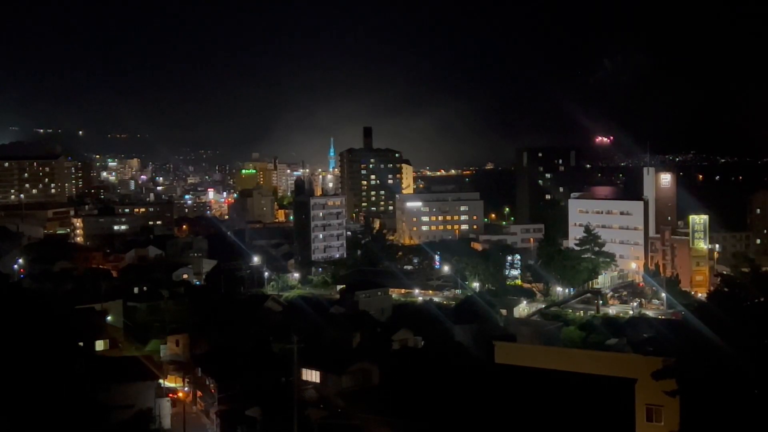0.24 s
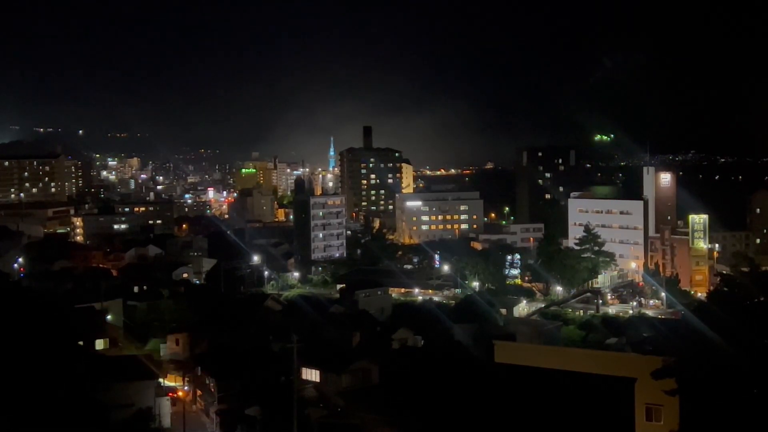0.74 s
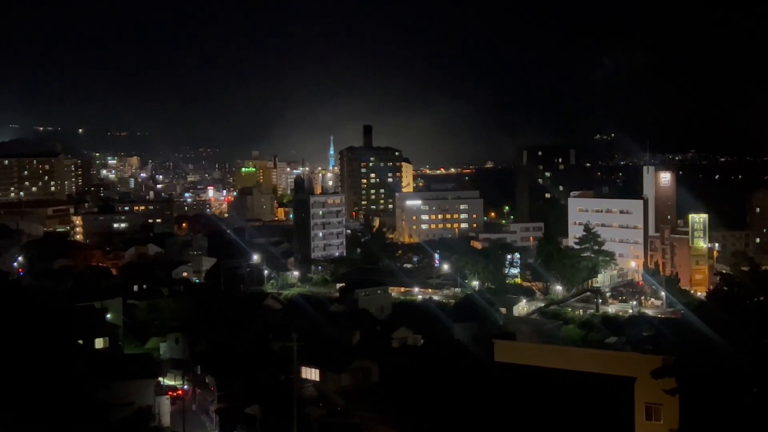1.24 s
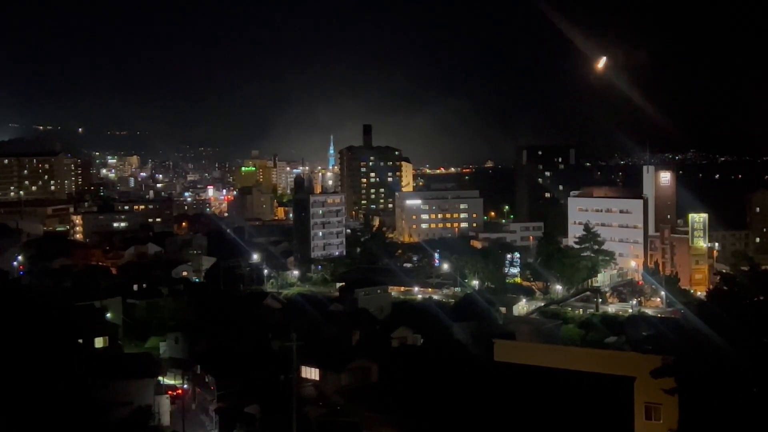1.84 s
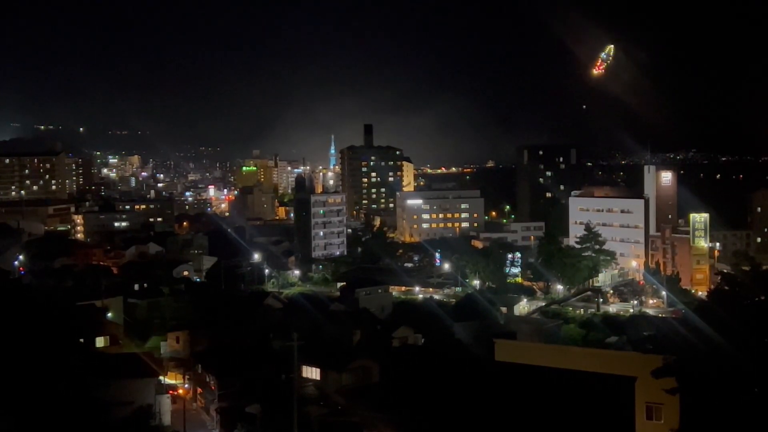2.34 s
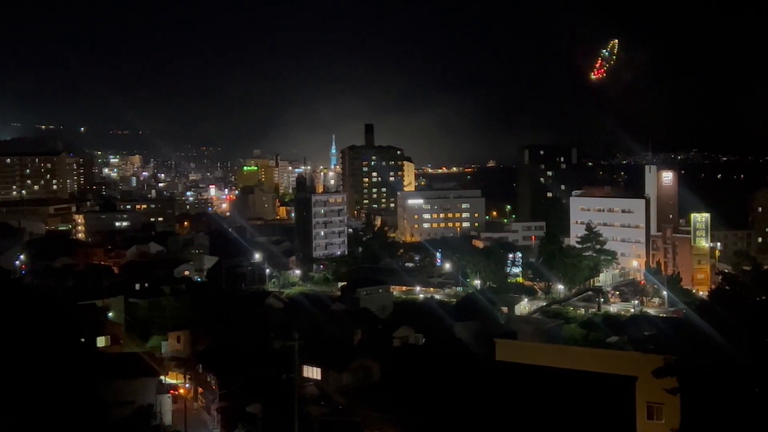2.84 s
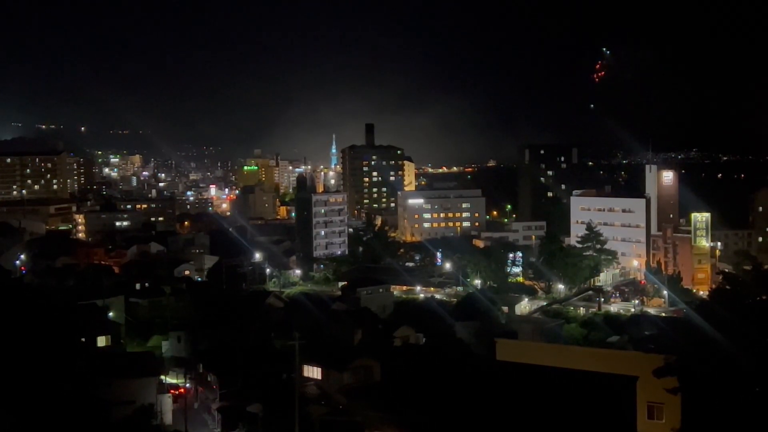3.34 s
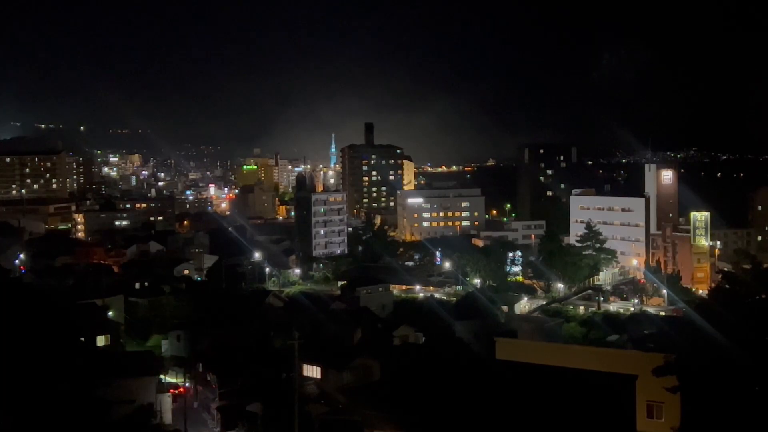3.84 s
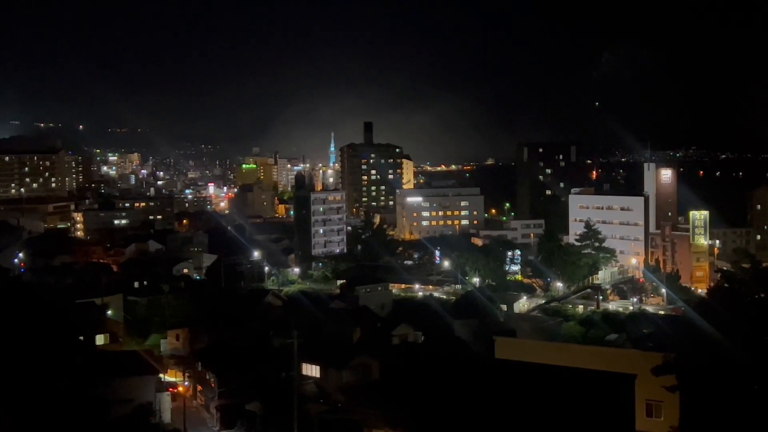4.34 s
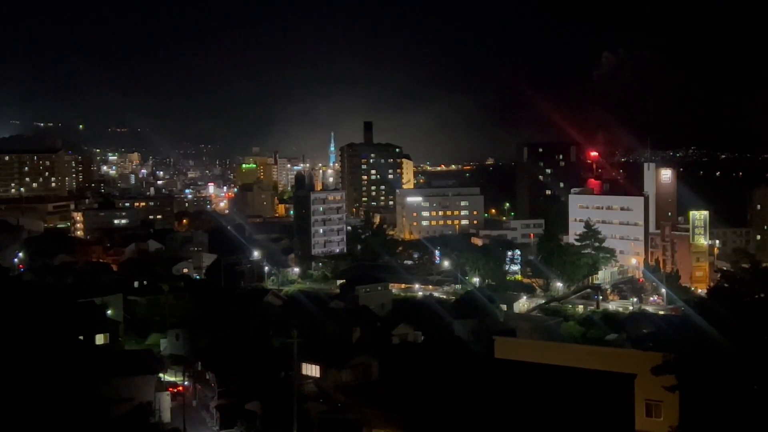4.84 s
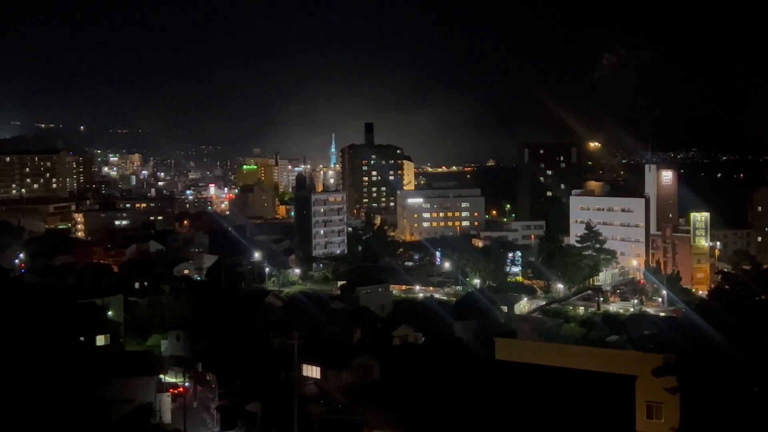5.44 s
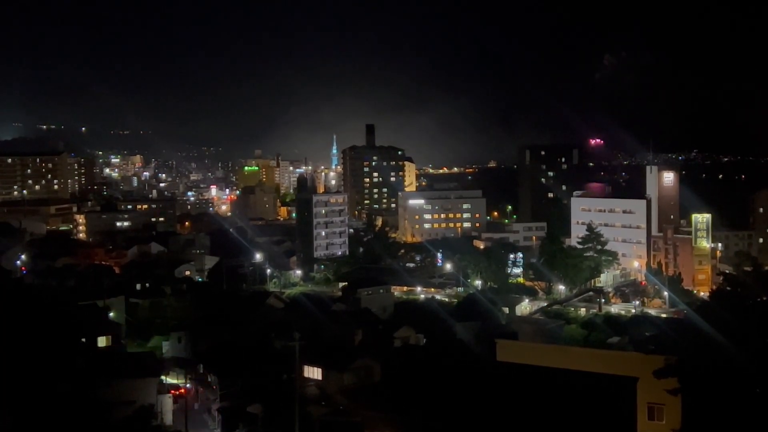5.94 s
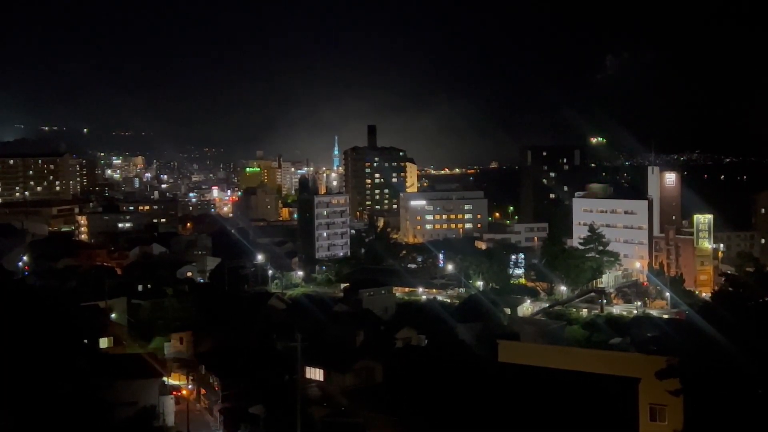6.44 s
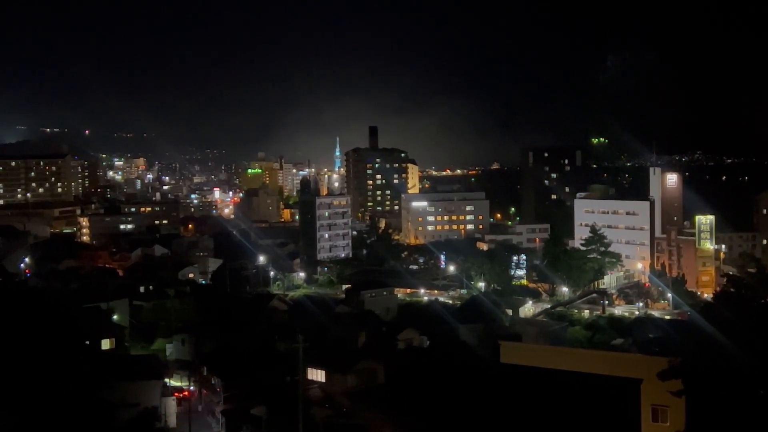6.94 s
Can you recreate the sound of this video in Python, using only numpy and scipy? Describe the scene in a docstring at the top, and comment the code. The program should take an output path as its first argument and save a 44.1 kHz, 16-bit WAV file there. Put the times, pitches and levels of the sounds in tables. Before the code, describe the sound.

Two distant firework booms echo over a city at night, while a bush cricket buzzes faintly over a low engine drone.

```python
"""Fireworks over a city at night

Two far firework shells boom, with a much fainter one between them. Buildings throw each boom back
and the streets roll on with it. Close by, a bush cricket buzzes without pause by scraping its wings;
other insects join in thinly. A distant engine drones under the wash of traffic, with a few dull thuds."""
import sys
import numpy as np
from scipy import signal
from scipy.fft import rfft, irfft, next_fast_len
from scipy.io import wavfile
from scipy.ndimage import map_coordinates

SR = 44100
rng = np.random.default_rng(int(sys.argv[2]) if len(sys.argv) > 2 else 0)


def store_pcm(level_fs):
    """Save levels as 16-bit WAV."""
    pcm = np.round(np.clip(level_fs, -1, 1) * 32767).astype(np.int16)
    wavfile.write(sys.argv[1], SR, np.atleast_2d(pcm).T)


N = 317079
TIME = np.arange(N) / SR

# Shell bursts. Treble fades above an "edge"; a "t60" is the time to fade by 60 dB.
# (time [s], relative level [dB], edge [Hz], scatter [dB], change per bounce [dB], bounce edge [Hz],
#  roll level [dB], roll edge [Hz], roll t60 [s])
SHELLS = [(1.4333, -14, 1900, 3, 8, 134, -33, 2400, 0.5), (3.038, -27.5, 250, 4, -3, 400, -50.5, 400, 1.2),
          (6.4882, 1, 1710, -2, -11, 1410, -36, 4500, 2)]


def blasts(level_db=-6, scatter_t60=0.075, scatter_rise_s=0.0028, scatter_hz=900):
    """Each boom is one pulse of air pressure, trailed by its scatter off nearby walls."""
    # a bang's tone after its long way through the air: (frequency [Hz], relative level [dB])
    bang_spectrum = [(25, -32), (45, -15), (62, -10), (85, -11), (125, -.5), (175, 2), (215, -1.5),
                     (270, -4), (360, -11.5), (560, -12), (1000, -22), (2300, -29.5), (4200, -42),
                     (6500, -59), (9000, -90)]
    out, bang = np.zeros(N), colour(bang_spectrum)
    gain = amp(level_db) / np.abs(pulse(bang)).max()
    for start_s, db, edge_hz, scatter_db in arrivals():
        wave = pulse(lambda hz: bang(hz) * air(hz, edge_hz))
        t = np.arange(len(wave)) / SR
        paths = rng.standard_normal(len(t)) * amp(-60 * t / scatter_t60) * fade_in(t, scatter_rise_s)
        paths *= amp(scatter_db) / np.linalg.norm(paths)
        # ledges and railings scatter short waves; the bass passes them by
        paths = signal.lfilter(*signal.butter(1, scatter_hz, "high", fs=SR), paths)
        paths[0] += 1  # the unscattered pulse
        add(out, start_s, -gain * amp(db) * signal.fftconvolve(wave, paths))
    return out


def arrivals(bounces=2, round_trip_s=0.0075, echo_scatter_db=3):
    """A boom arrives directly, then off the nearest walls, duller each bounce, then off far buildings."""
    # echoes off single buildings: (time [s], relative level [dB], treble edge [Hz])
    echoes = [(1.566, -14, 130), (1.668, -18.5, 450), (1.696, -23.5, 900), (1.876, -28.5, 2400),
              (2.099, -27.5, 2600), (6.546, -21, 350), (6.769, -22.5, 1600), (7.157, -23, 800)]
    near = []
    for start_s, db, edge_hz, scatter_db, step_db, bounce_hz, *_ in SHELLS:
        for k in range(bounces + 1):
            dulled_hz = 1 / (1 / edge_hz + k / bounce_hz)
            near.append((start_s + k * round_trip_s, db + k * step_db, dulled_hz, scatter_db))
    return near + [(*echo, echo_scatter_db) for echo in echoes]


def rolls(lumpy_db=0.8, lag_s=0.012, rise_s=0.0054):
    """Countless house fronts return the boom in clumps: the next block at once and loud, the farthest faint and
    long."""
    # tone of the rolling echo: (frequency [Hz], relative level [dB])
    roll_spectrum = [(25, -27), (80, -5), (150, 2), (230, -5.5), (330, -12), (600, -18.5), (1100, -22),
                     (2200, -33), (4000, -45), (7000, -61)]
    # (relative level [dB], treble edge [Hz], t60 [s])
    next_block, far_blocks = (9, 700, 0.1), (-14, 900, 9.7)
    out, tone = np.zeros(N), colour(roll_spectrum)
    for start_s, *_, db, edge_hz, t60 in SHELLS:
        start = round((start_s + lag_s) * SR)
        t = TIME[:N - start]
        roll = np.zeros(len(t))
        for zone_db, zone_hz, zone_t60 in (next_block, (0, edge_hz, t60), far_blocks):
            echoes = filtered(rng.standard_normal(N)[start:], lambda hz: tone(hz) * air(hz, zone_hz))
            roll += unit(echoes) * amp(zone_db - 60 * t / zone_t60)
        out[start:] += roll * amp(db + lumpy_db * wobble(60)[start:]) * fade_in(t, rise_s)
    return out


def bush_cricket(tooth_hz=565, slip=.06, mid_stroke_s=0.0137, level_db=-58.0,
                 leaves_db=-3, leaves_t60=0.04, uneven_teeth_db=0.84, effort_db=0.64):
    """Each wing stroke drags a scraper over teeth; each tooth rings the wing. Leaves scatter the clicks."""
    # speed of the wings: (time [s], stroke rate [Hz])
    stroke_rates = [(0, 26.12), (7.19, 25.94)]
    # the scraper's push through one stroke: (position [0 to 1], relative force [dB])
    stroke_force = [(0, -36), (.14, -9.5), (.3, -6.5), (.44, 3.5), (.5, -1), (.64, 0.5), (.69, -25),
                    (.85, -17), (1, -16.5)]
    # how the wing rings: (frequency [Hz], relative level [dB])
    wing_spectrum = [(6000, -34), (7700, -16.5), (8300, -7), (8650, 1.5), (9200, -1), (9550, -4),
                     (9950, -1.5), (10600, -7), (11300, -11.5), (12100, -22), (13000, -16), (13550, -17),
                     (14200, -21), (15600, -22.5)]
    # slow changes in the song's strength: (time [s], level change [dB])
    vigour = [(0, 0.5), (.7, 1.3), (2, -0.1), (3.2, 0), (4.3, -0.9), (5.7, -0.5), (6.5, 0.5), (7.19, 0)]
    strokes = np.cumsum(curve(stroke_rates)) / SR - mid_stroke_s * stroke_rates[0][1] + .5
    force_db = np.interp(strokes % 1, *np.transpose(stroke_force)) + effort_db * wobble(26)
    teeth_passed = np.cumsum(tooth_hz * (1 + slip * wobble(110))) / SR
    tooth_hits = np.diff(np.floor(teeth_passed), prepend=0)
    clicks = tooth_hits * amp(force_db + uneven_teeth_db * rng.standard_normal(N))
    # each click's energy dies away quickly among the leaves
    decay = amp(-60 * np.arange(SR // 20) / SR / leaves_t60) ** 2
    energy = np.abs(signal.fftconvolve(clicks ** 2, decay / decay.sum())[:N])
    leaves = np.sqrt(energy) * rng.standard_normal(N)
    song = signal.fftconvolve(clicks + amp(leaves_db) * leaves, pulse(colour(wing_spectrum)))[:N]
    return unit(song) * amp(level_db + curve(vigour))


def far_insects(chorus_db=-69):
    """Farther insects make a blurred chorus, one swelling rasp and a few thin, fading tones."""
    # one insect's rasp swells and fades: (time [s], level [dB])
    rasp_levels = [(0, -87), (3.1, -93), (3.6, -68.5), (4.0, -64.5), (4.5, -67.5), (5.1, -73), (5.8, -90),
                   (7.19, -92)]
    # cricket tones: (pitch [Hz], pitch wobble [Hz], level [dB], fade start [s], fade [dB/s])
    tones = [(7469, 6, -63, .1, 39), (5278, 10, -75.5, .1, 26), (5430, 45, -82, .22, 24)]
    out = amp(chorus_db) * band(centre_hz=8900, width_hz=1300)
    out += amp(curve(rasp_levels)) * band(centre_hz=8300, width_hz=1400)
    for hz, wobble_hz, db, start_s, fade in tones:
        phase = 2 * np.pi * np.cumsum(hz + wobble_hz * wobble(60)) / SR
        level_db = db - fade * np.maximum(TIME - start_s, 0) + 1.3 * wobble(60)
        out += np.sqrt(2) * np.sin(phase) * amp(level_db)
    return out


def engine(flutter_db=1.43, jitter_cycles=0.005):
    """Distance rounds exhaust pulses to a few low tones; the higher ones fade as the engine draws away."""
    # the engine slowly loses speed: (time [s], firing rate [Hz])
    firing_rates = [(0, 68.5), (.5, 69.4), (1.15, 68.37), (5.4, 66.17), (7.19, 66.2)]
    # its drone swells and sinks: (time [s], level change [dB])
    swell = [(0, -4), (.65, 4), (1.2, -3.5), (1.9, 1), (2.4, -3.5), (4.35, 2.5), (5.7, -5), (6.35, -1.5),
             (7.19, -4)]
    # exhaust tones at 1 to 4 times the firing rate: (level [dB], share of swell [0 to 1], fade [dB/s])
    harmonics = [(-47.5, 1, 0), (-50, .35, 0.8), (-54.5, 0.092, 2), (-68.5, .1, 2.5)]
    firings = np.cumsum(curve(firing_rates)) / SR + jitter_cycles * wobble(12)
    out, swell_db = np.zeros(N), curve(swell)
    for k, (db, share, fade) in enumerate(harmonics, 1):
        level_db = db + share * swell_db - fade * TIME + flutter_db * wobble(7.1)
        out += amp(level_db) * np.cos(2 * np.pi * k * firings)
    return out


def thuds(t60=0.13, rise_s=0.0061):
    """Only the lowest tone of a far thud arrives."""
    # deep thuds: (time [s], level before fading [dB], pitch [Hz])
    hits = [(2.12, -36, 38), (3.05, -47, 40), (4.004, -35, 40)]
    out, t = np.zeros(N), np.arange(SR // 2) / SR
    for start_s, db, pitch_hz in hits:
        loudness = amp(db - 60 * t / t60) * fade_in(t, rise_s)
        add(out, start_s, loudness * np.sin(2 * np.pi * pitch_hz * t))
    return out


def city(traffic_db=-61, rise_db_per_s=0.4129, waver_db=0.15, rumble_db=-56, hiss_db=-73):
    """Traffic blends into a slowly growing wash, over a low rumble and a faint, even hiss."""
    # tone of the traffic: (frequency [Hz], relative level [dB])
    traffic_spectrum = [(160, -12), (280, -3.5), (380, -5.5), (550, -4.5), (750, -4.5), (1000, -6.5),
                        (1400, -11), (1900, -17.5), (3000, -23.5), (6000, -39), (8000, -70)]
    # tone of the rumble: (frequency [Hz], relative level [dB])
    rumble_spectrum = [(15, 8), (30, -6.5), (50, -2), (80, 4.5), (110, -4.5), (190, -1), (280, -3.5),
                       (400, -21), (800, -69)]
    wash = noise(colour(traffic_spectrum)) * amp(traffic_db + rise_db_per_s * TIME + waver_db * wobble(6))
    rumble = noise(colour(rumble_spectrum)) * amp(rumble_db + 0.8 * wobble(7))
    return wash + rumble + amp(hiss_db) * rng.standard_normal(N)


def street_swells():
    """Faint sounds swell out of the streets and sink back."""
    # a far hum and a passing hiss: (peak time [s], half length [s], pitch [Hz], width [Hz], level [dB])
    swells = [(.43, .08, 605, 30, -65.5), (0.578, 0.091, 580, 120, -62.5), (3.501, .35, 4020, 900, -78.5)]
    return sum(band(hz, width_hz) * amp(db) * np.exp(-((TIME - peak_s) / half_s) ** 2)
               for peak_s, half_s, hz, width_hz, db in swells)


def amp(db):
    """Turn decibels into a number to multiply by."""
    return 10 ** (np.asarray(db) / 20)


def unit(x):
    """Scale a sound to an average power of 1."""
    return x / np.sqrt(np.mean(x ** 2) + 1e-20)


def colour(points):
    """Join (frequency [Hz], level [dB]) points into a response: a gain for every frequency."""
    points_hz, db = np.transpose(points)
    return lambda hz: amp(np.interp(np.log(hz + 1), np.log(points_hz + 1), db))


def curve(points):
    """Join (time [s], value) points with straight lines, one value per sample."""
    return np.interp(TIME, *np.transpose(points))


def fade_in(t, rise_s):
    """Climb smoothly from 0 towards 1."""
    return 1 - np.exp(-t / rise_s)


def wobble(rate):
    """A smooth curve through `rate` random values a second."""
    return map_coordinates(rng.standard_normal(int(N * rate / SR) + 4), [TIME * rate])


def filtered(x, response):
    """Turn each frequency of a sound up or down by the response."""
    size = next_fast_len(len(x) + 8192)
    return irfft(rfft(x, size) * response(np.fft.rfftfreq(size, 1 / SR)), size)[:len(x)]


def noise(response):
    """Noise shaped by the response, at power 1."""
    return unit(filtered(rng.standard_normal(N), response))


def band(centre_hz, width_hz):
    """Noise around one pitch, at power 1."""
    return noise(lambda hz: 1 / (1 + ((hz - centre_hz) / width_hz) ** 4))


def pulse(response, size=16384):
    """A pulse with this tone, its energy packed as early as possible."""
    cepstrum = irfft(np.log(response(np.fft.rfftfreq(size, 1 / SR)) + 1e-6))
    # fold the part before time zero onto the part after it
    cepstrum[1:size // 2] *= 2
    cepstrum[size // 2 + 1:] = 0
    return irfft(np.exp(rfft(cepstrum)))


def air(hz, edge_hz):
    """Air dulls the treble above the edge; a longer path has a lower edge."""
    return 1 / np.sqrt(1 + (hz / edge_hz) ** 2)


def add(track, start_s, sound):
    """Mix a sound into the track at its start time."""
    part = track[round(start_s * SR):][:len(sound)]
    part += sound[:len(part)]


def scene():
    """Fireworks, city and insects, mixed into one channel."""
    fireworks = blasts() + rolls()
    streets = thuds() + engine() + city() + street_swells()
    insects = bush_cricket() + far_insects()
    return (fireworks + streets + insects)[None]


def record(dry, top_hz=15770):
    """Cut away the very highest treble."""
    return np.array([filtered(channel, lambda hz: hz < top_hz) for channel in dry])


dry = scene()
out = record(dry)
store_pcm(out)
```